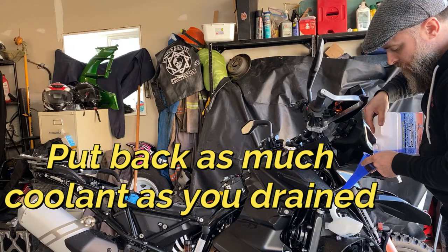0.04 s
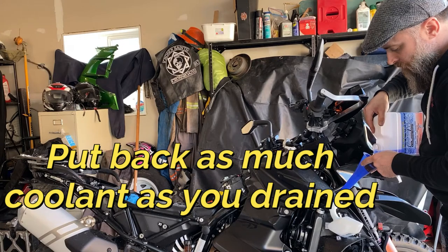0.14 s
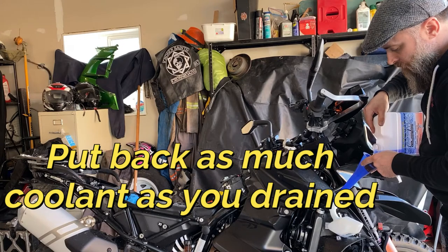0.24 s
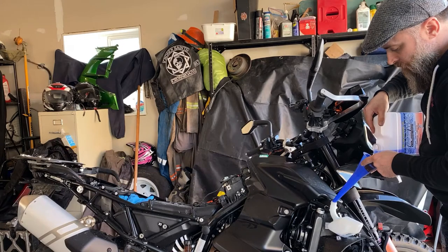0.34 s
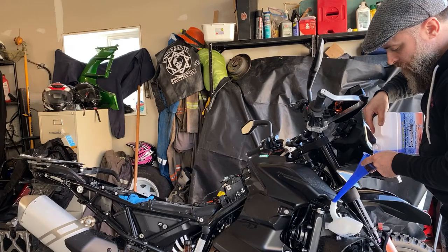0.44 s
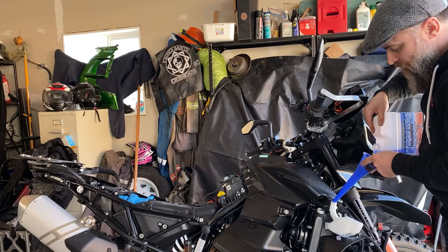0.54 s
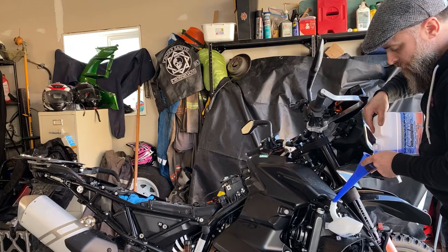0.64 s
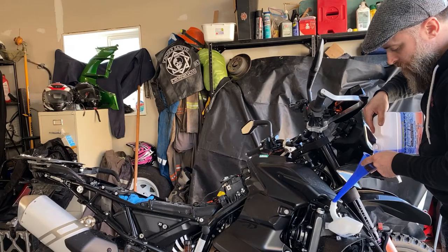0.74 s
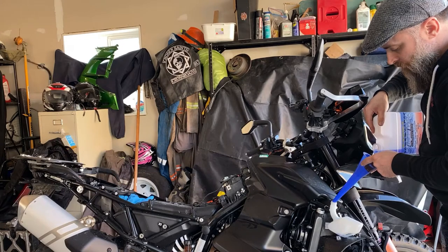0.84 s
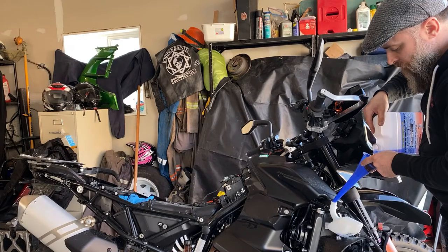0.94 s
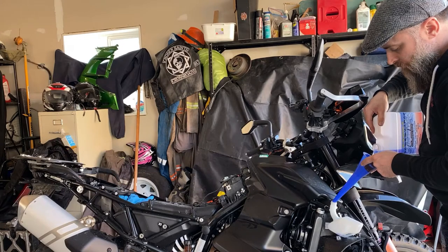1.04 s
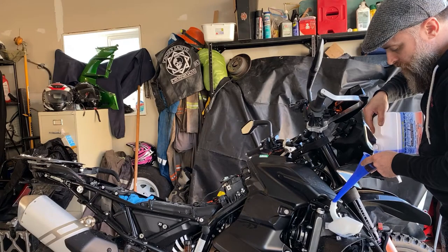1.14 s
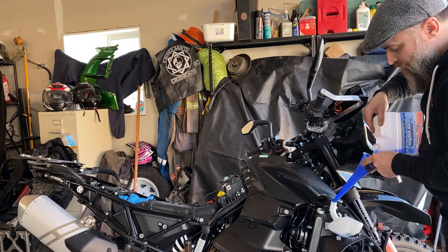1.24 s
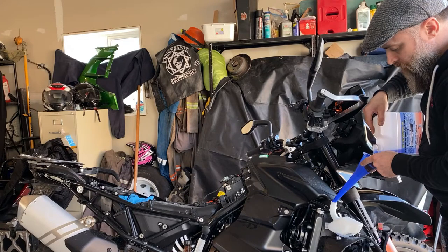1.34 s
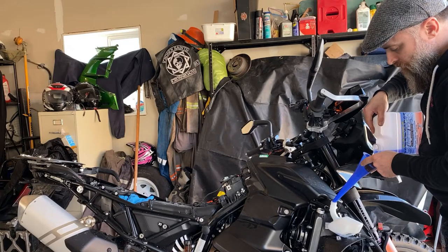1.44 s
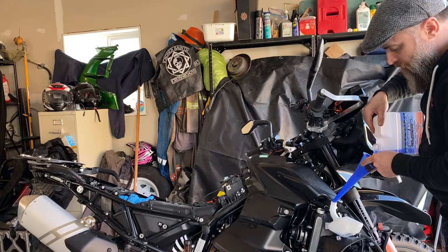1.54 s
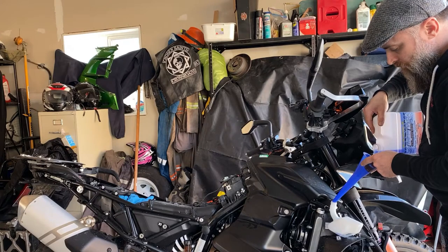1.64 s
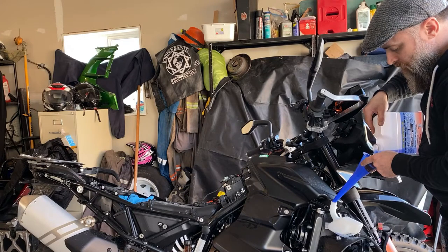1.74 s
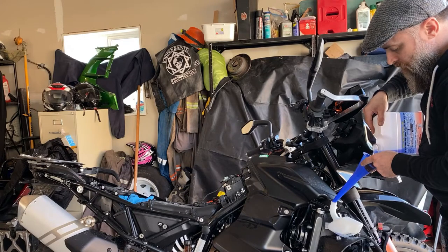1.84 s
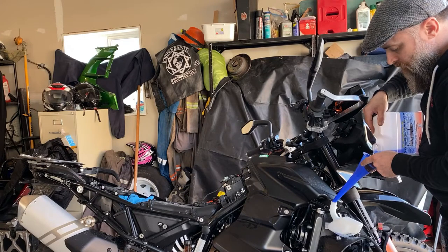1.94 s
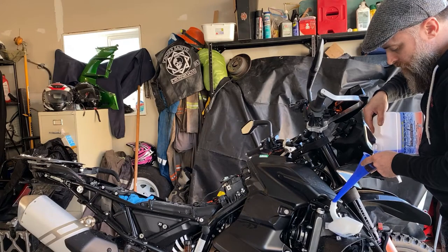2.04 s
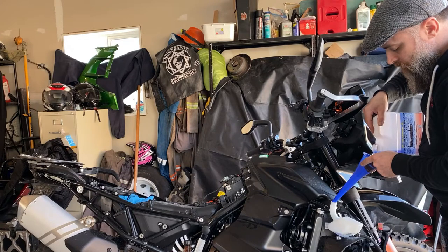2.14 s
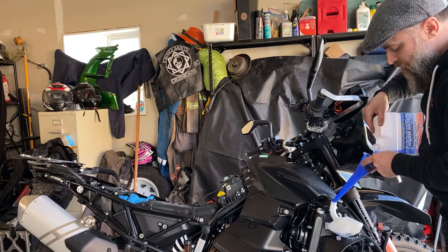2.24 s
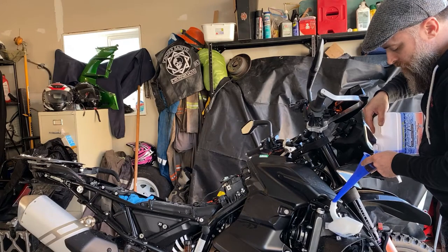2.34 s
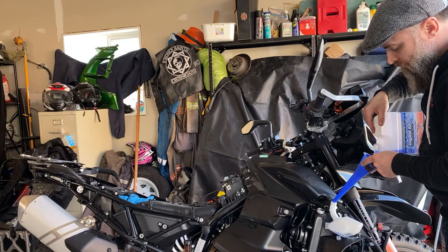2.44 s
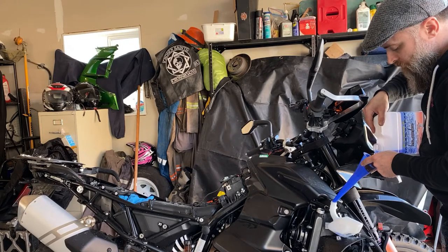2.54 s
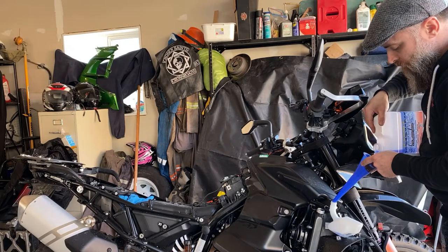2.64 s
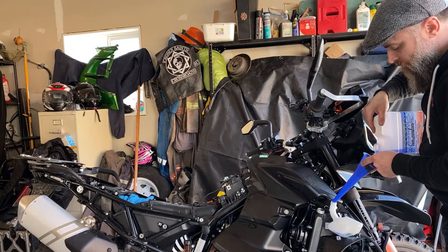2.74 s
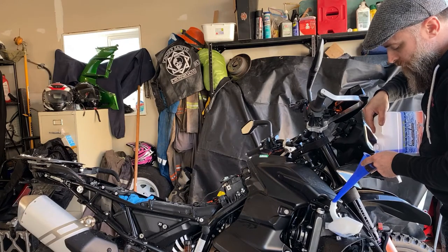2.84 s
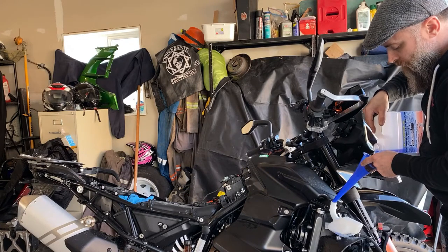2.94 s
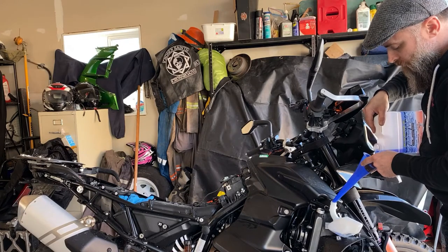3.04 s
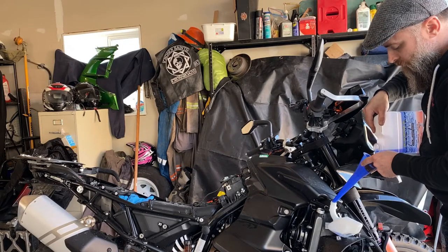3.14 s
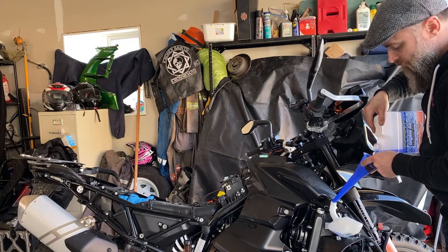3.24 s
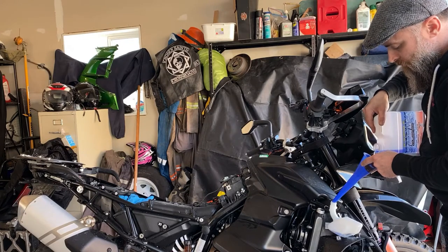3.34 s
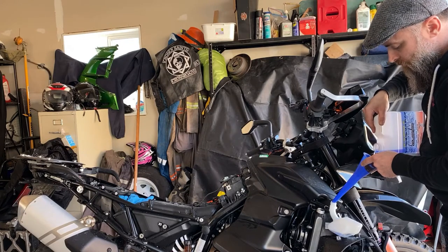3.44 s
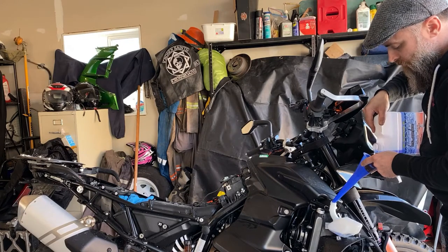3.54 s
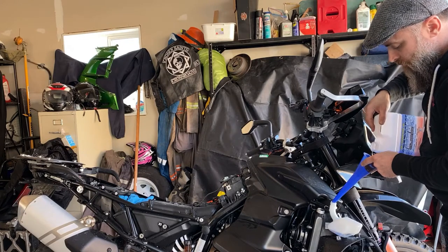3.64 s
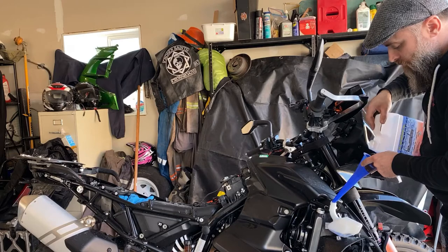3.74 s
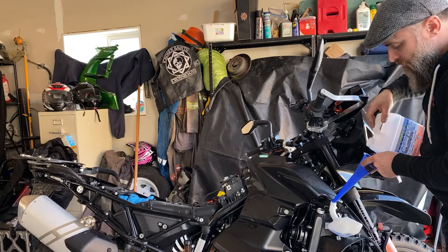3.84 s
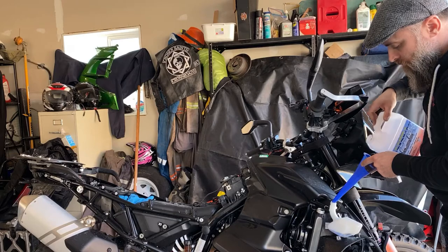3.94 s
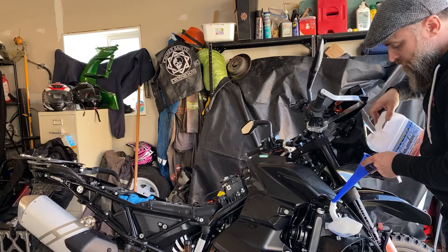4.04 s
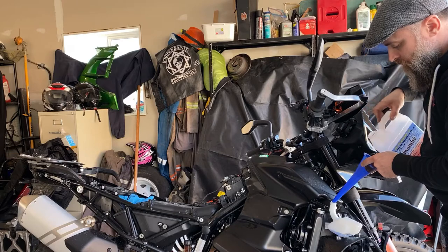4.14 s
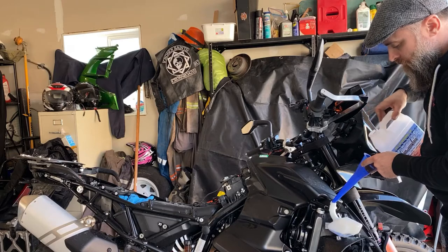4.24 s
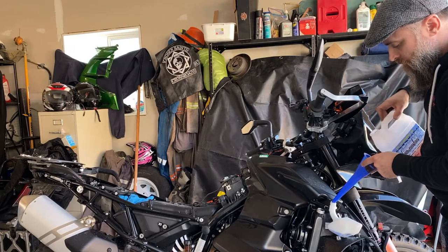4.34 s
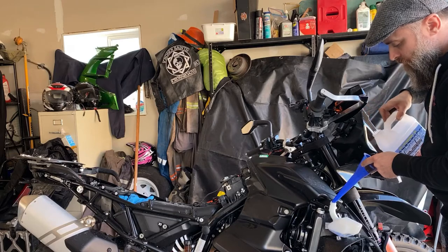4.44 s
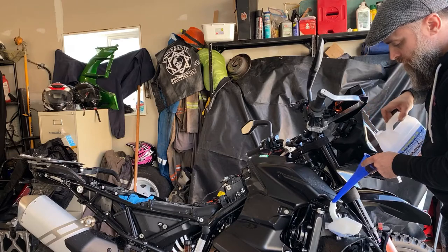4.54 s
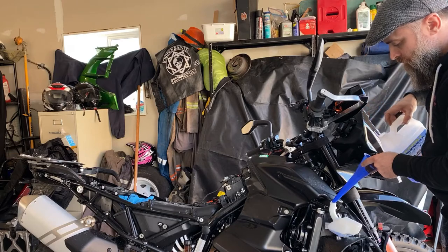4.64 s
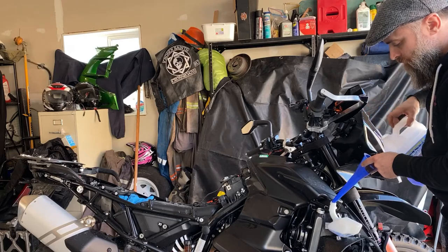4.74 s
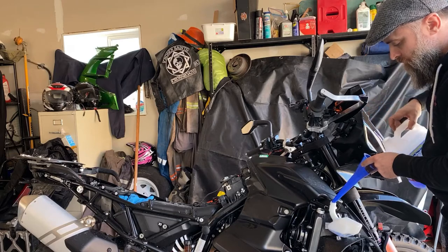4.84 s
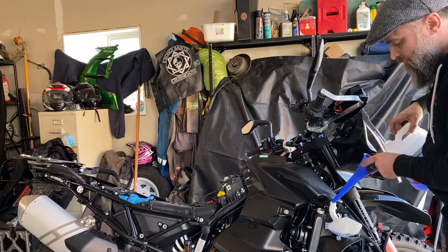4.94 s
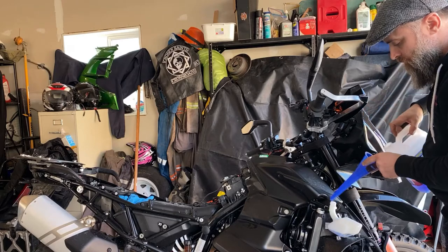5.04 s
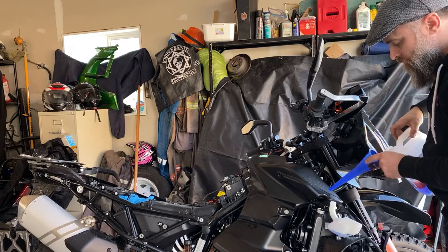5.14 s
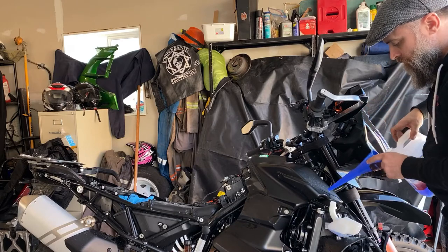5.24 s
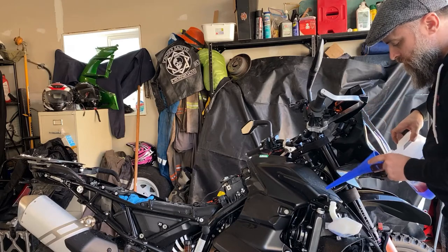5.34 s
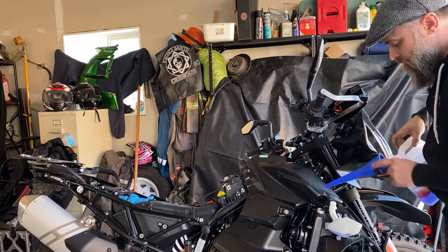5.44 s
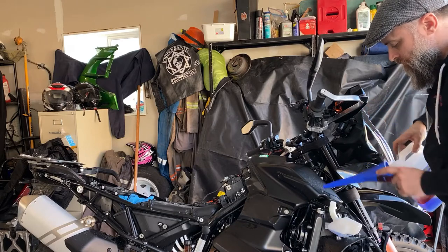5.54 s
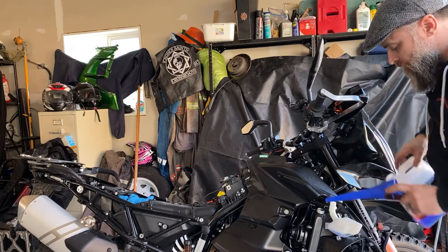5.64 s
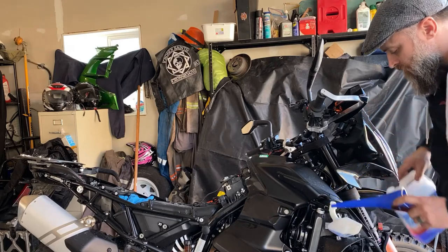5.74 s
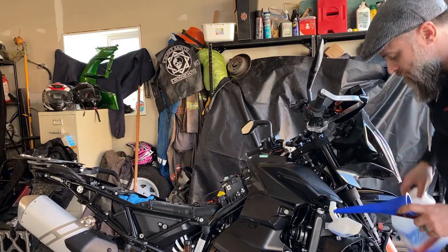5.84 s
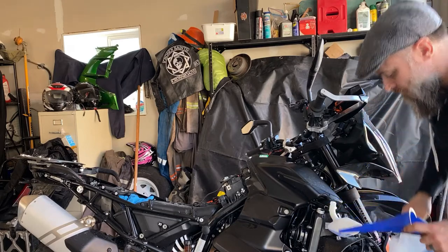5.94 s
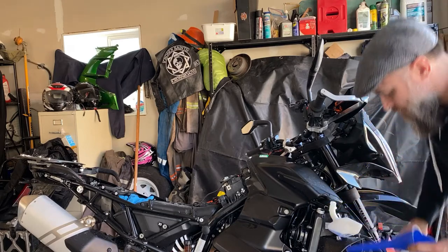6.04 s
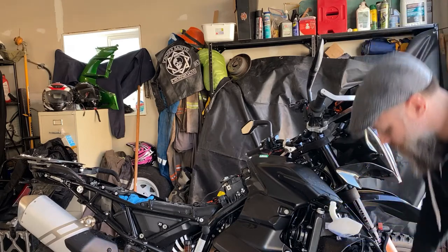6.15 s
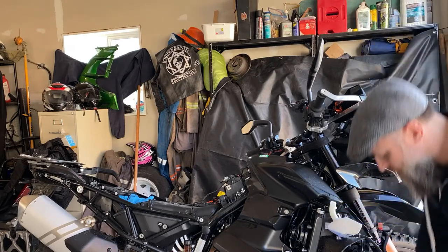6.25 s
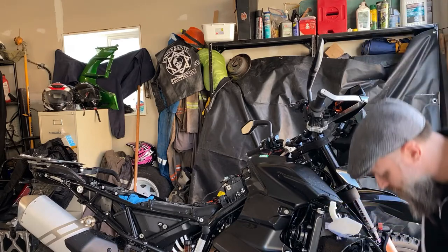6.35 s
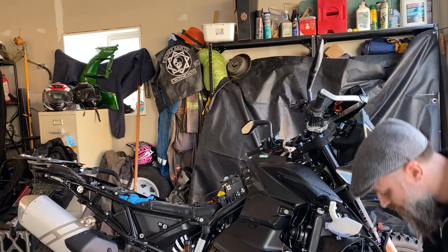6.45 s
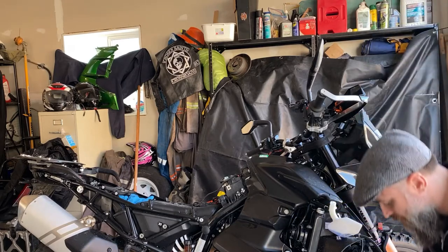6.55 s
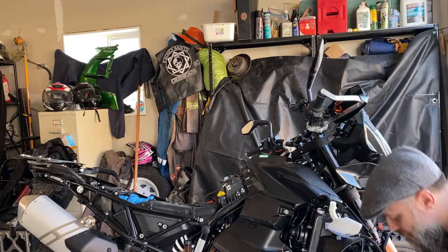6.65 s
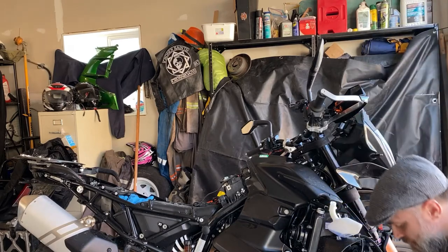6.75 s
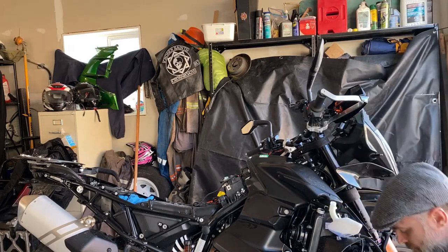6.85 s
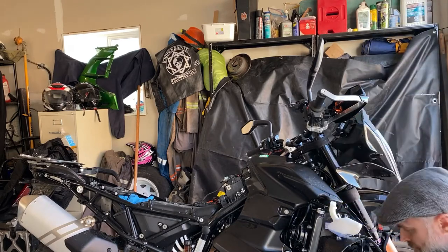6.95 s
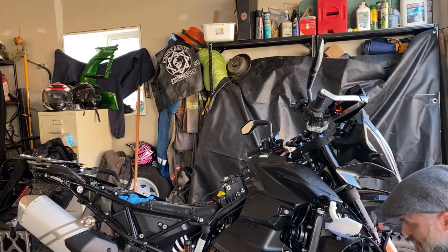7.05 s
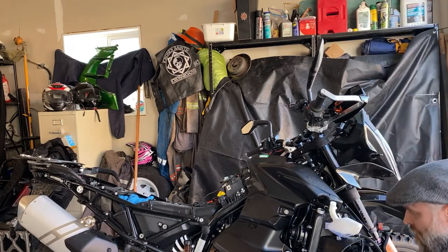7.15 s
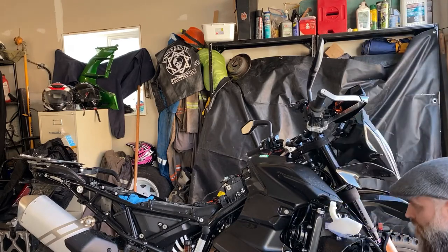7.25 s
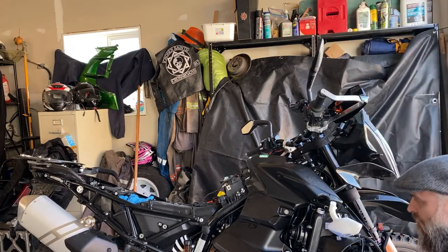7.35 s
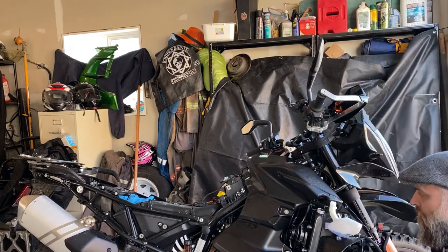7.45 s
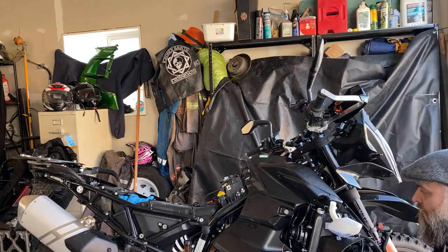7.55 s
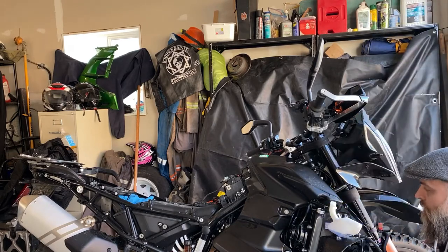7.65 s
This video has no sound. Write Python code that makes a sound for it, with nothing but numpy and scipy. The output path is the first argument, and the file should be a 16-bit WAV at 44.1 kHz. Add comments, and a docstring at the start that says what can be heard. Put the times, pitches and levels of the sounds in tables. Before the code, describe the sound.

Thin coolant trickles and ticks in small drops into a hollow plastic reservoir, then a jug is set down with a loud hollow knock.

```python
"""In a quiet garage, coolant trickles from a plastic jug through a funnel into a reservoir.
Drops tick and ring the reservoir walls: decaying modes, a trapped bubble and a spray of noise.
The jug knocks (damped modes, dull noise, a click), its edges tick, and it is set down on the floor.
Cloth, slosh and rumble are shaped noise that follows a man as he bends; a soft air bed flickers behind."""
import sys
import numpy as np
from scipy import signal
from scipy.fft import rfft, irfft
from scipy.io import wavfile
from scipy.ndimage import uniform_filter1d

SR = 44100
rng = np.random.default_rng(int(sys.argv[2]) if len(sys.argv) > 2 else 0)


def to_wav(s):
    """Save 16-bit WAV."""
    ch = np.atleast_2d(s).T  # columns
    pcm = np.round(np.clip(ch, -1, 1) * 32767)  # PCM
    wavfile.write(sys.argv[1], SR, pcm.astype(np.int16))


N = 339570

# wall modes of the reservoir: (frequency [Hz], level [dB], t60 [s])
RESERVOIR_MODES = [(1050, -11, 0.028), (1161, 5, 0.03), (1608.4, -0.5, 0.051), (1662, 0.5, 0.031),
                   (2072, -9, 0.029), (2768, -6, 0.056), (3548, -3, 0.045), (4073, -4.5, 0.041),
                   (5390, -4, 0.0068), (6270, -10, 0.041), (6163, 4, 0.02), (6520, -2.5, 0.047)]
# modes of the hollow jug: (frequency [Hz], level [dB], t60 before any hand or floor damping [s])
JUG_MODES = [(208.1, 0, 0.92), (254.4, -3.5, 0.17), (282.5, -10.5, 0.77), (304.3, -0.5, 0.73),
             (362.5, -1.5, 0.026), (423, -0.5, 0.12), (442, 0, 0.21), (492, -4.5, 0.096), (610, -0.5, 0.13),
             (700, -6.5, 0.33), (788, 1.5, 0.073), (886, -7, 0.12), (1066, 0, 0.17), (1204, -3.5, 0.34),
             (1616, -7.5, 0.33), (2060, -24, 0.15), (2600, -15, .1)]


def undb(db):
    """Gain of a level in dB."""
    return 10 ** (np.asarray(db) / 20)


def colour(points, size=N):
    """Noise of rms 1 whose spectrum follows (frequency [Hz], relative level [dB]) points."""
    hz, db = np.transpose(points)
    grid = np.log(np.arange(size // 2 + 1) * SR / size + 1)
    level_db = np.interp(grid, np.log(hz), db, -150, -150)
    noise = irfft(rfft(rng.standard_normal(size)) * undb(level_db), size)
    return noise / np.std(noise)


def walk(rate):
    """Random levels held for 1 / rate seconds and smoothed twice; spread near 1."""
    hold = int(SR / rate)
    held = rng.standard_normal(size=2000)[np.arange(N) // hold % 2000]
    return 1.8 * uniform_filter1d(uniform_filter1d(held, hold), hold)


def ring(hz, db, t60, phase, rise, size=4096):
    """Sum of decaying modes that swell with time constant rise [s] while the contact lasts."""
    t = np.arange(size) / SR
    waves = np.sin(2 * np.pi * (np.outer(hz, t) + phase[:, None]))
    decays = np.exp(-np.log(1000) * np.outer(1 / t60, t))
    return (undb(db) @ (waves * decays)) * (1 - np.exp(-t / rise))


def near(hz, pitch_hz, level_db, db_per_oct):
    """Level of each mode: full at the struck pitch, falling away from it."""
    return level_db - db_per_oct * abs(np.log2(hz / pitch_hz))


def add(out, s, x):
    """Mix x into out from time s."""
    i = int(s * SR)
    out[i:i + len(x)] += x[:len(out) - i]


def air():
    """Garage background: noise in octave bands that swell together and flicker alone."""
    # spectrum of the background: (frequency [Hz], relative level per Hz [dB])
    air_spectrum = [(15, -10), (30, -0.5), (60, -2.5), (120, -7.5), (220, -12.5), (380, -18), (520, -15),
                    (800, -23.5), (1200, -30.5), (2000, -33), (3200, -35.5), (4800, -35), (6300, -30),
                    (7200, -34), (8200, -25.5)]
    level_db = -66.5
    bed, swell = rfft(colour(air_spectrum)), walk(1.916)
    octave = np.log2(np.arange(len(bed)) * SR / N + 1)
    out = np.zeros(N)
    for centre in range(3, 15):
        band = irfft(bed * np.clip(1 - abs(octave - centre), 0, 1), N)
        out += band * undb(.8 * swell + walk(7))
    return out * undb(level_db)


def jug_wash():
    """Noise of rms 1 through resonances at the jug's modes, favouring the low ones."""
    wash = colour([(150, -2.0), (300, 1.5), (600, -13.5), (1100, -17.5), (1500, -41.5)])
    hollow = .5 * wash
    for hz, db, _ in JUG_MODES:
        resonance = signal.lfilter(*signal.iirpeak(hz, 22, SR), wash)
        hollow += undb(db + 8.0 - hz / 150) * resonance
    return hollow / np.std(hollow)


def movement():
    """Low rumble, noise in the jug's low modes and grainy cloth follow the man's moves and each scuff."""
    # body movement: (time [s], air and floor rumble [dB], slosh in the jug [dB], cloth rustle [dB])
    moves = [(3.5, -82, -92, -91), (3.72, -63, -66.5, -76.5), (4.1, -70, -68.5, -83.5),
             (4.4, -78.5, -80, -90), (5.5, -82, -80.5, -84), (5.85, -62.5, -68.5, -68.5),
             (6.06, -47.5, -66, -70.5), (6.25, -65.5, -71.5, -70.5), (6.55, -67, -63.5, -74.5),
             (6.9, -61.5, -74, -69), (7.05, -55, -54.5, -68), (7.25, -63, -63, -74.5),
             (7.7, -63, -71.5, -73)]
    # spectrum of the cloth: (frequency [Hz], relative level per Hz [dB])
    cloth_spectrum = [(400, -6), (700, -3), (1400, -5), (2800, -10), (4200, -13.5), (6300, -13),
                      (8000, -29)]
    # cloth and jug drag over something, gains ahead of the stroke shape and the grains:
    # (time [s], stroke time scale [s], jug body gain [dB], rustle gain [dB])
    scuffs = [(3.833, 0.036, -60, -79), (4.644, 0.1, -60.5, -73), (5.7, 0.031, -72, -79),
              (5.756, 0.028, -51, -87), (6.03, 0.038, -75, -62), (6.181, 0.029, -73, -55.5),
              (6.42, 0.049, -53.5, -74), (6.529, 0.049, -49, -61), (6.582, 0.05, -45, -65),
              (6.804, 0.05, -45.5, -72), (6.946, 0.045, -19.5, -45.5), (7.026, 0.039, -25.5, -46.5),
              (7.089, 0.072, -48.5, -64.5), (7.298, 0.043, -54, -98), (7.386, 0.033, -66, -70)]
    t = np.arange(N) / SR
    rumble = colour([(18, -4.5), (45, -3.0), (90, -5.0), (140, -11.0)])
    hollow, cloth = jug_wash(), colour(cloth_spectrum)
    s, *levels = np.transpose(moves)
    rumble_gain, hollow_gain, cloth_gain = (undb(np.interp(t, s, db, -120)) for db in levels)

    # the floor thuds as the jug lands
    thud_s, thud_db, thud_decay_s = 6.952, -35, 0.025
    rumble_gain += undb(thud_db) * (t > thud_s) * np.exp(-abs(t - thud_s) / thud_decay_s)

    # dragging catches and slips, so the rustle of a scuff breaks into grains
    slips = undb(2.4 * walk(260) + 2.45 * walk(60))
    for at, length, body_db, rustle_db in scuffs:
        age = np.maximum(t - at, 0) / length
        stroke = 1.64 * age * np.exp(-age ** 2)
        hollow_gain += undb(body_db) * stroke
        cloth_gain += undb(rustle_db) * stroke * slips
    return rumble * rumble_gain + hollow * hollow_gain + cloth * cloth_gain


def edge_ticks():
    """Dry ticks of hard plastic edges: bright noise that dies within a few ms."""
    # (time [s], peak level [dB], brightest frequency [Hz])
    ticks = [(4.8463, -60, 2780), (5.607, -54.5, 3150), (5.6705, -47.5, 2700), (6.965, -34, 2900),
             (6.9861, -26, 6010), (6.9974, -28.5, 2290), (7.0214, -31, 2000), (7.0392, -38, 2020),
             (7.0495, -37, 2550), (7.064, -34.5, 2260), (7.3548, -50.5, 2150)]
    out, t = np.zeros(N), np.arange(16384) / SR
    for s, peak_db, top in ticks:
        noise = colour([(top / 4, -12), (top, -1), (top * 1.2, -4), (top * 2, -14), (15500, -24)], size=len(t))
        tick = noise * np.exp(-t / 0.0016)
        add(out, s, tick * undb(peak_db) / abs(tick).max())
    return out


def jug_knocks():
    """Blows on the jug ring its modes with a dull thud and a click; a later strong blow chokes the ring."""
    # (time [s], hollow tone [Hz], its relative level [dB], wall tone [Hz], its relative level [dB],
    #  relative click level [dB], damping by hand or floor [1/s])
    blows = [(3.647, 350, -57.5, 1090, -51, -60, 62), (3.809, 365, -51.5, 750, -56.5, -55, 22),
             (3.829, 348, -49.5, 750, -60, -65, 25), (4.654, 347, -45, 1200, -62, -54, 17),
             (4.78, 312, -40, 820, -46, -49, 49), (5.085, 214, -49.5, 800, -59, -69, 210),
             (5.097, 790, -55.5, 1460, -52, -72, 104), (5.755, 327, -41.5, 700, -44.5, -53.5, 140),
             (5.95, 500, -73, 950, -52.5, -59, 42), (6.422, 206, -45, 745, -61, -43.5, 107),
             (6.438, 216, -44, 500, -50, -57.5, 47), (6.582, 425, -36, 890, -37.5, -58, 10),
             (6.792, 375, -37, 1285, -27.5, -36.5, 18), (6.816, 322, -47, 1208, -40.5, -40.5, 6.7),
             (6.95, 228.5, -8.5, 1090, -32, -36, 1), (7.001, 335, -14, 1046, -24, -37, 38.5),
             (7.037, 432, -25, 1210, -37, -41, 14), (7.277, 240, -52, 1110, -59.5, -60, 41),
             (7.382, 280, -50, 895, -63.5, -82, 17)]
    hollow_db_per_oct, wall_db_per_oct = 14.5, 22
    grit_spectrum = [(500, 8.5), (1200, 2.5), (2500, 5), (4500, -6.0),
                     (6200, -1.5), (7500, -13.5), (11000, -7), (15500, -16)]
    hz, db, t60 = np.transpose(JUG_MODES)
    out, t = np.zeros(N), np.arange(16384) / SR
    for k, (s, low, low_db, high, high_db, click_db, damping) in enumerate(blows):
        chance = rng.standard_normal((2, len(hz)))
        hollow_share = near(hz, low, low_db, hollow_db_per_oct)
        wall_share = near(hz, high, high_db, wall_db_per_oct)
        blow_db = db + np.maximum(hollow_share, wall_share)
        tone = ring(hz, blow_db + .8 * chance[0], t60, chance[1] * hz / 4000, .0015, size=len(t))

        # a held jug answers with many close, quickly lost modes: noise of the same colour
        thud_hz = np.r_[140, hz, 4000]
        thud_db = np.r_[blow_db[0] - 20, blow_db, blow_db[-1] - 14]
        thud = colour(np.c_[thud_hz, thud_db], size=len(t))
        thud *= np.exp(-t / 0.04) * np.minimum(t / 0.0022, 1)
        tone += undb(blow_db.max() - 1.5) * min(damping / 30, 1) * thud

        # time [s] to the next blow, over 45 ms away, that is strong enough to choke this one
        chokes = [r[0] - s for r in blows[k + 1:] if r[2] > low_db - 6 and r[0] - s > .045]
        choke = min(chokes + [1])
        add(out, s, tone * np.exp(-t * abs(damping) - np.maximum(t - choke, 0) / 0.004))

        click_decay = np.exp(-t / 0.0028) + 0.2 * np.exp(-t / 0.013) + 0.044 * np.exp(-t / 0.05)
        add(out, s, undb(click_db + 2.0) * colour(grit_spectrum, size=len(t)) * click_decay)
    return out


def jug_radiation(x):
    """The small jug radiates little below its lowest mode: a high-pass."""
    return signal.sosfilt(signal.butter(4, 165, "high", fs=SR, output="sos"), x)


def small_drops():
    """Weaker drops that fall at random with the flow, each with two pitches taken from the wall modes."""
    # (time [s], small drops per second [1/s])
    flow = [(0, 2), (.5, 2), (.6, 12), (1.1, 5), (1.2, 21), (2.58, 33.6), (2.65, 1), (3.4, 2), (3.55, 35),
            (3.8, 40), (3.87, 6), (4.1, 1)]
    hz = np.transpose(RESERVOIR_MODES)[0]
    rows = []
    # 400 candidates over 4.1 s, thinned to the wanted rate
    for at, keep, size, low, high, ping in rng.random(size=(400, 6)) * [4.1, 400 / 4.1, 1, 4, 5, 1]:
        if keep < np.interp(at, *np.transpose(flow)):
            rows.append((at, -69 + 9 * size, hz[int(low)], hz[int(high) + 4], -14 + 16 * ping))
    return rows


def drop_sound(low, high, ping_db):
    """A drop rings wall modes near two pitches, others faintly, traps a bubble, splashes and rebounds."""
    low_ring_db, low_db_per_oct, ping_db_per_oct = -11, 27, 40
    others_db, others_db_per_oct = -17, 3.5
    bubble_db, bubble_t60_s = -3, 0.033
    hz, db, t60 = np.transpose(RESERVOIR_MODES)
    t = np.arange(2048) / SR
    shares = np.max([near(hz, hz[0], others_db, others_db_per_oct),
                     near(hz, low, low_ring_db, low_db_per_oct),
                     near(hz, high, ping_db, ping_db_per_oct)], axis=0)
    chance = rng.standard_normal((6, len(hz)))

    # the liquid level and the spot that is hit detune the walls a little
    drop = ring(hz * (1 + 0.013 * chance[0]), db + shares + 3.3 * chance[1], t60, chance[2], 0.0022)
    # the bubble sounds at the high pitch
    drop += ring([high], [ping_db + bubble_db], np.array([bubble_t60_s]), chance[2, :1], 0.0019)

    # the drop rebounds: a smaller one lands a few ms later on another spot
    rebound_db = db + shares - 15.5 + 4 * chance[4]
    rebound = ring(hz * (1 + 0.028 * chance[3]), rebound_db, t60, chance[5], 0.00088)
    lag = int(SR * (.005 + 0.007 * abs(chance[5, 0])))
    drop[lag:] += rebound[:-lag]

    # the splash is noise coloured by the same shares, swelling and breaking up within a few ms
    spray_hz = np.r_[600, hz, 9000]
    spray_db = np.r_[shares[0] - 10, shares, shares[-1] - 6]
    spray = colour(np.c_[spray_hz, spray_db], size=len(t))
    drop[:len(t)] += undb(shares.max() - 8) * spray * np.exp(-t / .006) * (1 - np.exp(-t / 0.0019))
    return drop


def drops():
    """The trickle: single placed drops and random small ones, each scaled to its peak level."""
    # (time [s], peak level [dB], low ring [Hz], high ping [Hz], relative ping level [dB])
    placed_drops = [(0.0218, -54, 1760, 3560, 3), (0.2327, -61.5, 1760, 2150, -8),
                    (0.378, -63, 1100, 4100, 3), (0.5307, -44, 1280, 5750, -22),
                    (0.5893, -38.5, 1630, 6190, -18.5), (0.6494, -61.5, 1190, 4750, 3),
                    (0.8555, -54.5, 1800, 6660, -10), (0.9453, -55, 1230, 2785, -7.5),
                    (1.1023, -62.5, 1650, 4000, 8), (1.1549, -37, 1440, 2110, -7.5),
                    (1.194, -52, 1660, 2770, -7), (1.2216, -48.5, 1200, 2750, -11),
                    (1.2455, -49.5, 1100, 2120, -11), (1.2585, -50.5, 1750, 2140, -15),
                    (1.2993, -53.5, 1120, 2100, -16), (1.335, -45.5, 1030, 2155, -5),
                    (1.4006, -50, 1560, 3610, 3.5), (1.4626, -62, 1110, 2050, -5),
                    (1.5155, -56.5, 1120, 1960, -14), (1.6003, -55, 1060, 3500, -12),
                    (1.6247, -60, 1050, 3480, 2), (1.6635, -58, 1720, 4140, -6),
                    (1.6855, -59.5, 1200, 3560, -7), (1.713, -57, 1620, 3530, -10),
                    (1.7468, -49.5, 1110, 3520, -28), (1.773, -63, 1560, 5830, 1),
                    (1.7988, -50.5, 1150, 1990, -18), (1.8083, -51, 1590, 2000, -8),
                    (1.857, -59, 1590, 5800, -19), (1.8913, -47.5, 1490, 5110, -12),
                    (1.911, -54, 1600, 4020, -1), (1.932, -63, 1080, 2750, -8),
                    (1.966, -59, 1070, 4070, -6), (2.036, -51, 1740, 5190, -8),
                    (2.07, -53.5, 1110, 2090, -11.5), (2.096, -56, 1600, 3450, -3),
                    (2.1206, -62, 1620, 2880, -12), (2.134, -55.5, 1650, 3480, -16),
                    (2.161, -50, 1610, 6100, -17), (2.2714, -49.5, 1140, 3530, -22),
                    (2.2892, -56, 1700, 3590, -2), (2.321, -51, 1560, 2760, -40),
                    (2.3625, -62, 1150, 3650, -1), (2.394, -49, 1580, 3570, -21),
                    (2.4215, -62, 1090, 6250, 2), (2.498, -53, 1590, 3600, -3.5),
                    (2.5267, -51, 1500, 4000, -19), (2.576, -52.5, 1630, 3550, 2),
                    (2.609, -52.5, 1490, 2750, -12), (2.8415, -45.5, 1630, 1950, -25),
                    (2.8597, -52, 1160, 2790, -19), (2.967, -60, 1590, 2490, -6),
                    (3.1854, -53, 1680, 2800, -6), (3.4245, -39, 1630, 1940, -16),
                    (3.4446, -50, 1610, 3700, -2), (3.4639, -54, 1830, 1970, -5),
                    (3.5299, -56, 1240, 3600, -4), (3.5572, -55.5, 1170, 2800, 11),
                    (3.58, -57, 1200, 3770, 11), (3.6087, -46.5, 1520, 3760, -7),
                    (3.6485, -42, 1170, 3440, -20), (3.6738, -51.5, 1070, 1990, -6),
                    (3.698, -52.5, 1610, 4930, 9), (3.716, -53, 1130, 6300, 6),
                    (3.7576, -52, 1630, 3680, 2), (3.8068, -50.5, 1400, 3180, -1),
                    (3.92, -63, 1000, 3860, 4)]
    out = np.zeros(N)
    for s, peak_db, low, high, ping_db in list(placed_drops) + small_drops():
        drop = drop_sound(low, high, ping_db)
        # start early, as the drop takes a moment to swell
        add(out, s - .0025, drop * undb(peak_db) / abs(drop).max())
    return out


def garage(x):
    """Diffuse tail of the room: decaying noise in three ranges that fades in over 21 ms."""
    # (centre frequency [Hz], t60 [s], level [dB])
    tail_ranges = [(247, 0.27, -26), (1000, 0.46, -28.5), (4000, 0.14, -22)]
    t, tail = np.arange(SR) / SR, 0
    for hz, t60, db in tail_ranges:
        part = colour([(hz / 4, -20), (hz / 2, -3), (hz, 0), (hz * 2, -3), (hz * 4, -20)], size=SR)
        part = part * np.exp(-np.log(1000) * t / t60) * np.clip(t / 0.021, 0, 1)
        tail = tail + undb(db) * part / np.sqrt(np.sum(part ** 2))
    return signal.fftconvolve(x, tail)[:N]


def scene():
    """All sources, the struck ones with their room."""
    hits = drops() + jug_radiation(jug_knocks() + edge_ticks())
    return (hits + garage(hits) + movement() + air())[None]


def record(dry):
    """The sound dips briefly once; a narrow microphone path, faint leak and hiss, a steep top."""
    dip_s, dip_width_s = 5.065, .012
    mic_hz, top_hz = 8200, 15700
    leak_db, hiss_db = -34.5, -93.5  # the leak is what passes above the microphone's band
    dip = np.clip(abs(np.arange(N) / SR - dip_s) / dip_width_s, 0, 1)
    narrow = signal.sosfilt(signal.cheby2(11, 48, mic_hz, fs=SR, output="sos"), dry * dip)
    hiss = undb(hiss_db) * colour([(3000, -5.5), (10000, -4), (20000, -10.0)])
    mix = narrow + undb(leak_db) * dry + hiss
    return signal.sosfilt(signal.ellip(10, .2, 70, top_hz, fs=SR, output="sos"), mix)


dry = scene()
out = record(dry)
to_wav(out)
```